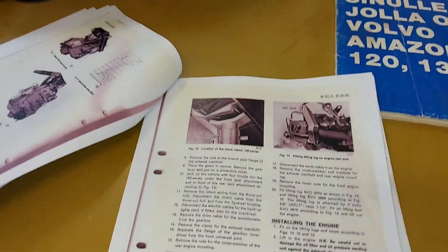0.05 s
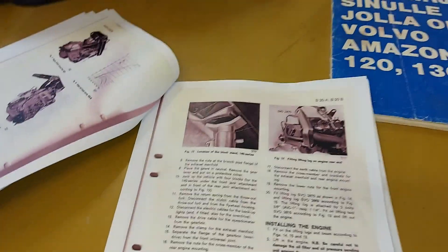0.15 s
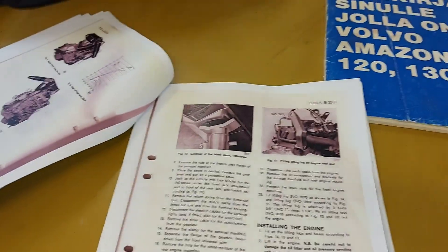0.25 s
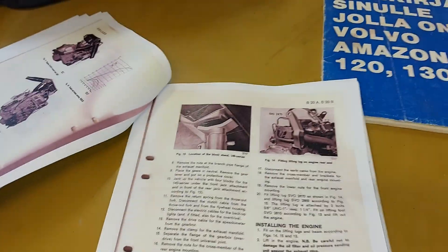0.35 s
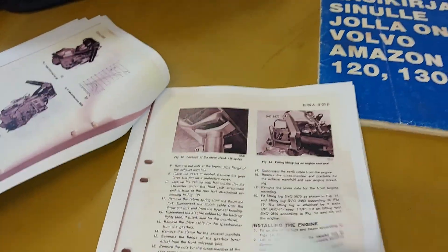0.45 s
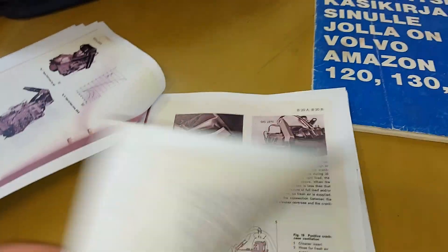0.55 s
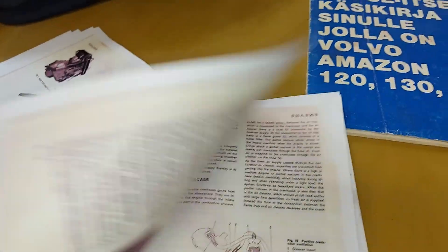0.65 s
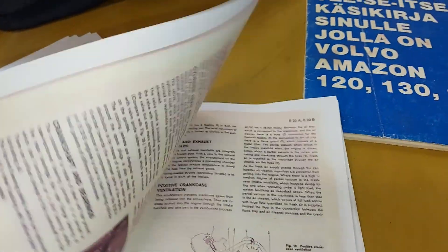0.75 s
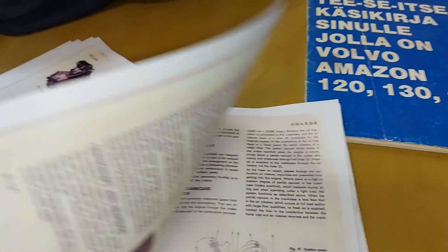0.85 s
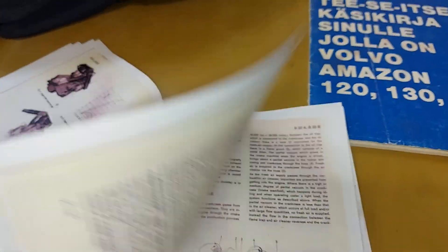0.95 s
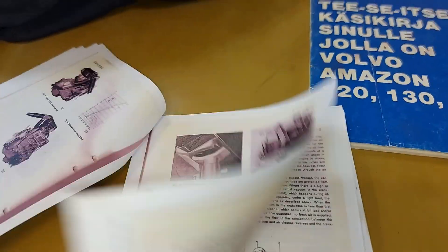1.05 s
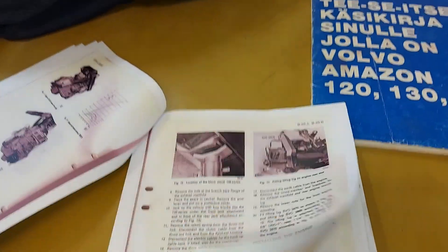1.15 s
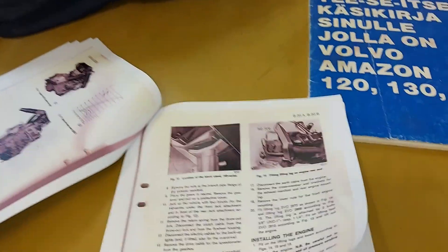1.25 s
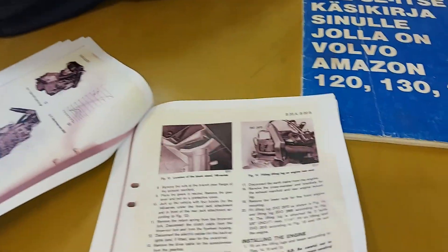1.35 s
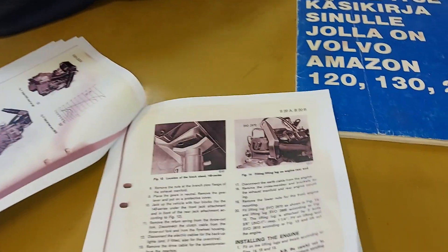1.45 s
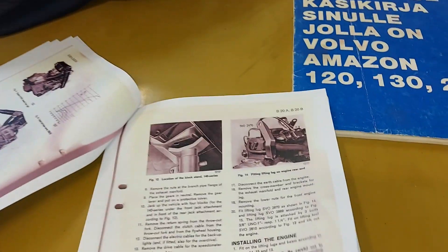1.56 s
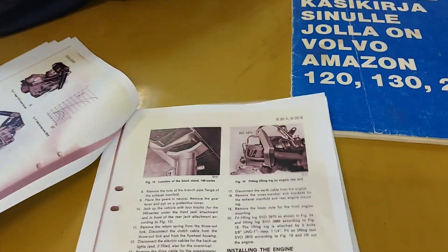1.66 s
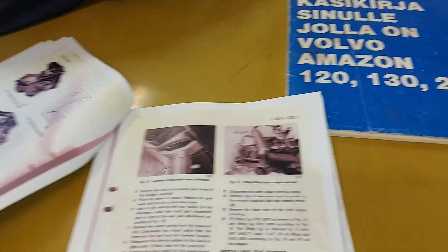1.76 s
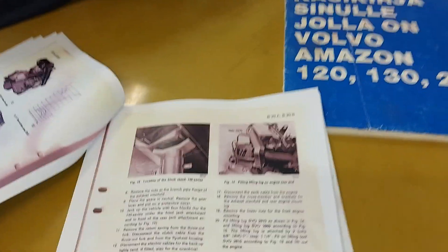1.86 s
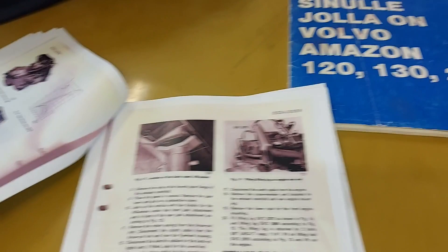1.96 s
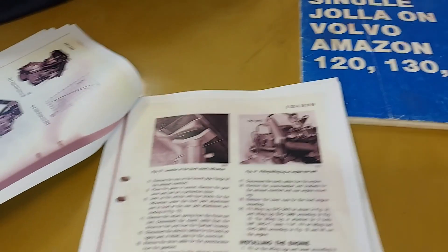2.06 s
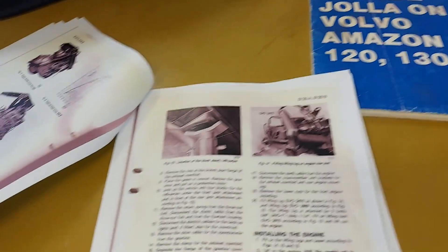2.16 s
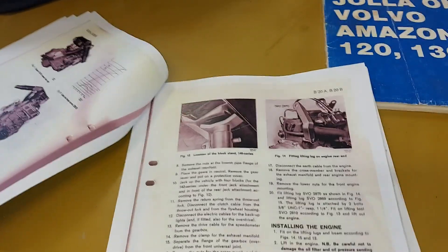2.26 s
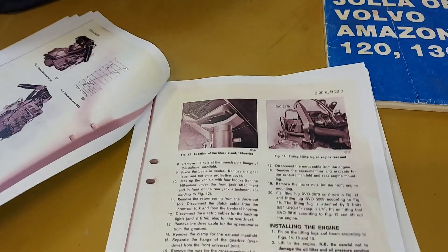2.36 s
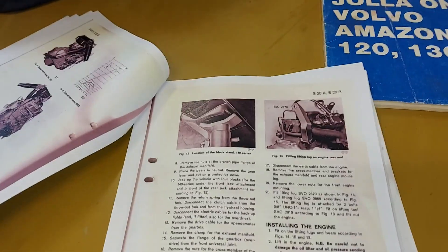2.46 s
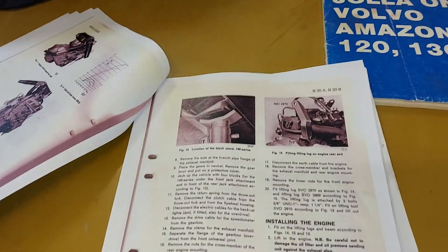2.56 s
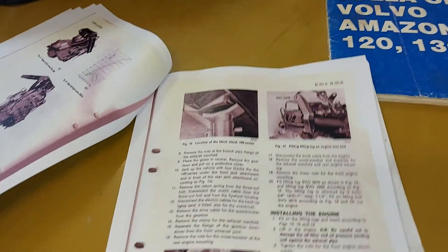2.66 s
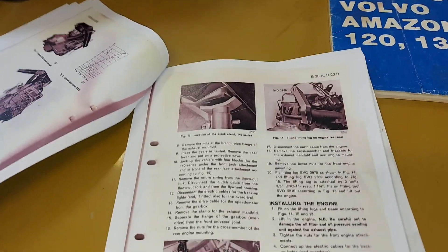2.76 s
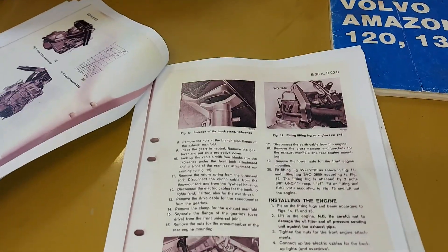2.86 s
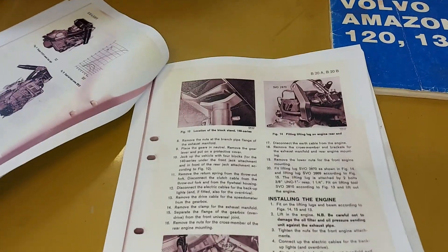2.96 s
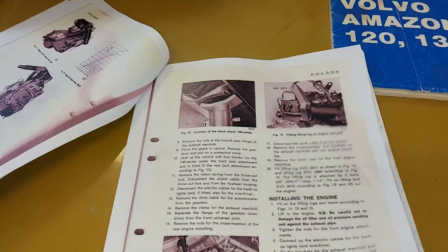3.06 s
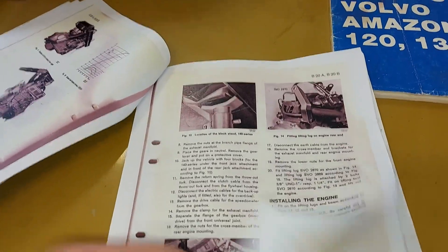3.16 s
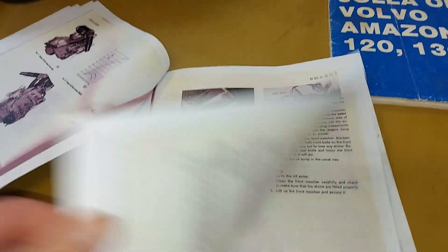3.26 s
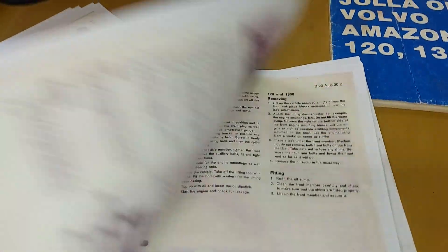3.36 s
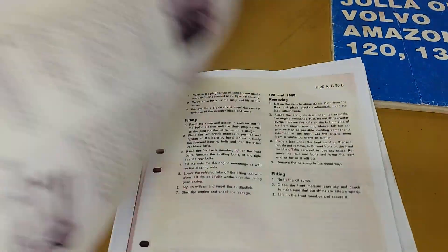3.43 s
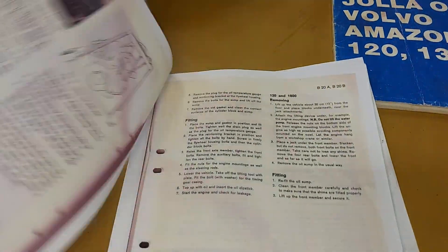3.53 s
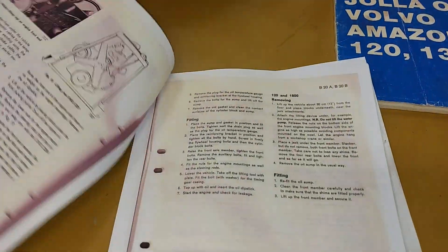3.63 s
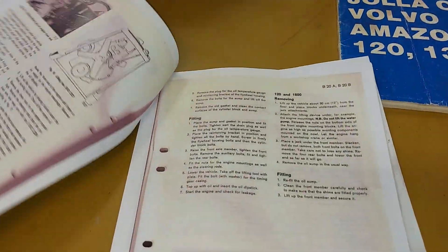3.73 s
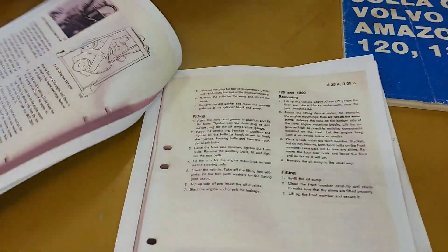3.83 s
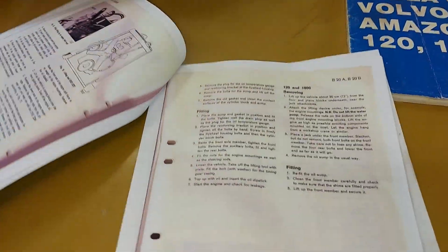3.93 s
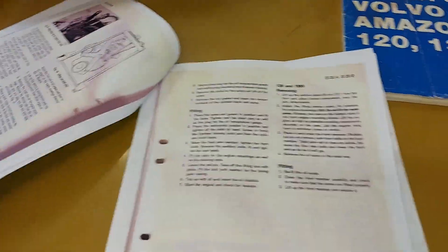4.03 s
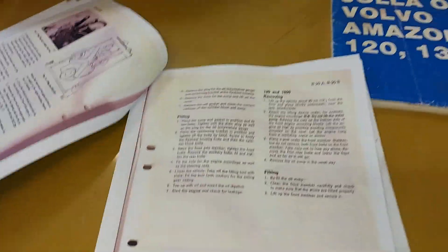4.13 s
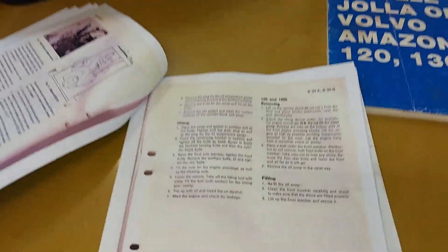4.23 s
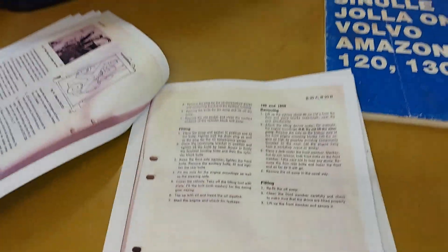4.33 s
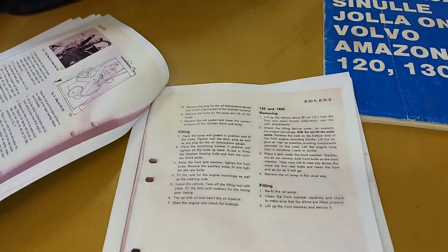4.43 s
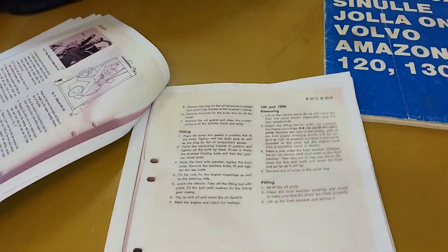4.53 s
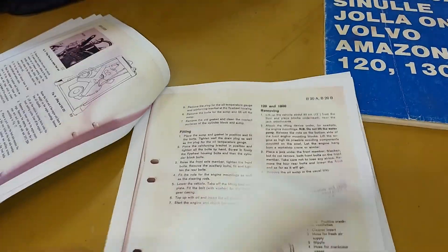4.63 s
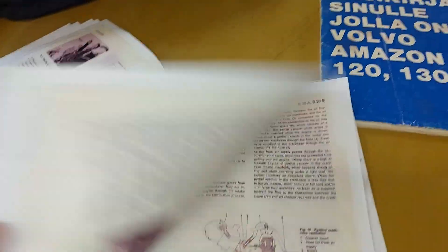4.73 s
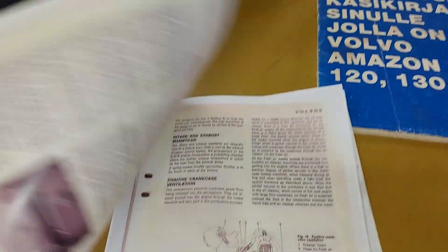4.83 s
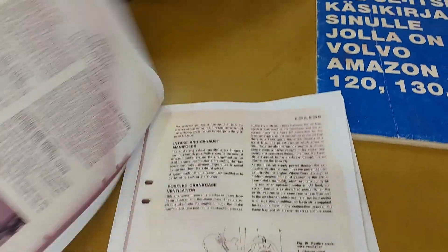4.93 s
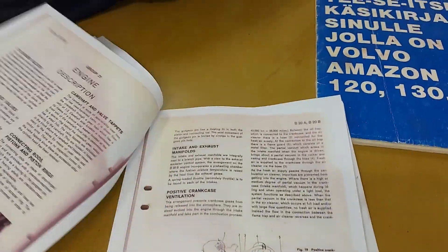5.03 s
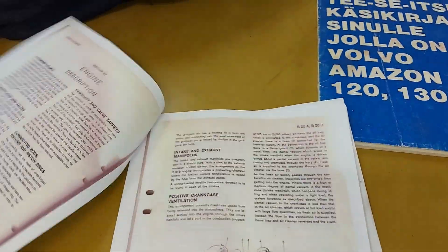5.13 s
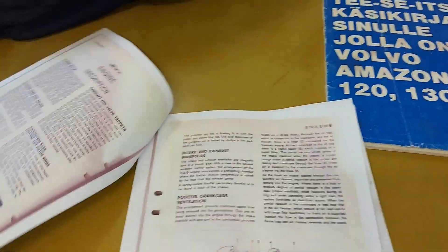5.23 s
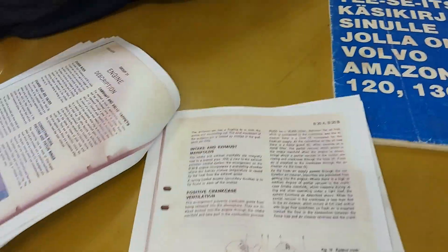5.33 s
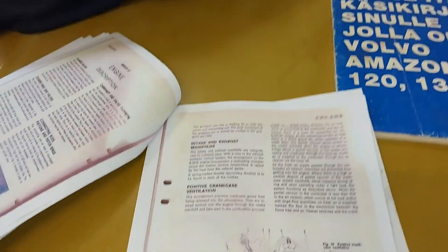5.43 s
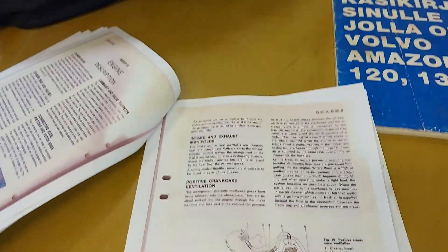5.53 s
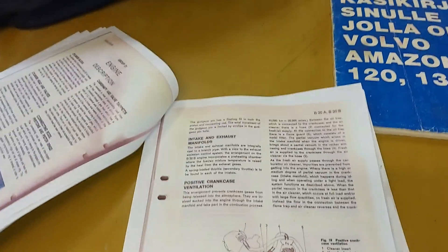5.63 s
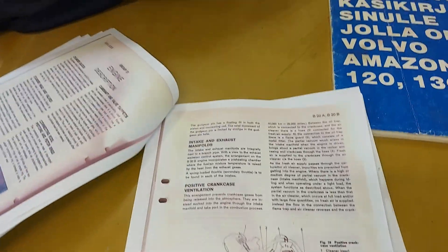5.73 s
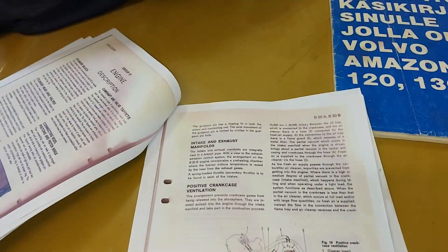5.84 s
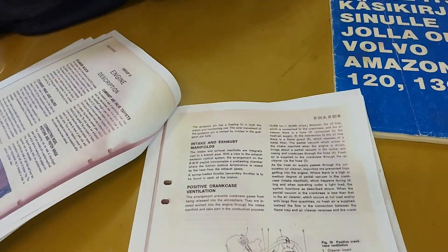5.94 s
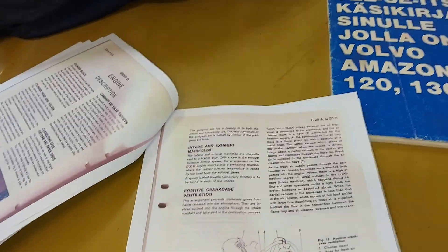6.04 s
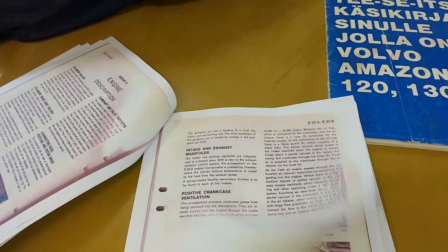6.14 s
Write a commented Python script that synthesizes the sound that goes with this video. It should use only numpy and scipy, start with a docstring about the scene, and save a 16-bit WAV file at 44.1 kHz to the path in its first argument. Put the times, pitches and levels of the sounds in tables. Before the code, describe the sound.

Paper pages are turned close by in three short bouts of rustling, flapping and crackling, with brief pauses in a quiet room.

```python
"""Leafing through loose sheets.

Printed sheets are turned on a desk in a quiet workshop, close to a near-mono microphone. Each slides
off the pile by stick-slip friction, bends and buckles with small snaps, flaps over with puffs of air
and settles on the turned pile. In a pause something rings faintly further off."""
import sys
import numpy as np
from scipy import signal
from scipy.fft import rfft, irfft
from scipy.io import wavfile
from scipy.ndimage import uniform_filter1d

SR = 44100
rng = np.random.default_rng(int(sys.argv[2]) if len(sys.argv) > 2 else 0)


def log_audio(samples):
    """Write samples as a 16-bit WAV file to the path given in sys.argv[1]."""
    # one column per channel
    frames = np.atleast_2d(samples).T
    # limit to full scale, then quantise
    limited = np.clip(frames, -1, 1)
    pcm = np.round(limited * 32767).astype(np.int16)
    wavfile.write(sys.argv[1], SR, pcm)


N = 272927
TIME = np.arange(N) / SR


# Pulls of one sheet over another. Each row: time of full contact, attack and length in seconds, then
# relative level, its change over the stroke and relative treble emphasis, all in dB.
STROKES = [(.005, 0.047, 0.11, -60.5, 1, -16), (0.152, 0.0075, 0.038, -43.5, 2, 1.5),
           (0.215, 0.012, 0.028, -41.5, -1.5, -1.5), (0.254, 0.016, 0.06, -37.5, 1.5, 3.5),
           (0.386, 0.13, 0.1, -46.5, 1.5, 9), (0.583, 0.052, 0.046, -46.5, -1, 11),
           (0.69, 0.044, 0.12, -58.5, 3.5, 8), (0.836, 0.006, 0.062, -41.5, -3, -7),
           (0.958, .04, 0.1, -55.5, -3, 4), (1.17, 0.085, 0.17, -57.5, -1, 4),
           (1.376, 0.004, 0.17, -49, -2, 5), (1.599, 0.025, 0.068, -51.5, 1, 9),
           (1.724, 0.032, 0.32, -63.5, -16, 10.5), (2.312, .012, 0.33, -73, 6, 8),
           (2.768, 0.08, 0.11, -53.5, -4.5, 2), (3.002, 0.023, 0.021, -36, 6.5, 2),
           (3.04, .03, 0.047, -44.5, -14.5, 18), (3.102, 0.024, 0.13, -48.5, -9.5, 12.5),
           (3.216, 0.1, 0.17, -58.5, 2, -10), (3.461, 0.048, 0.096, -54, -8, -19),
           (3.615, 0.075, 0.021, -53.5, 4.5, -4.5), (3.857, 0.029, 0.15, -60, -14.5, 9.5),
           (4.033, 0.0089, 0.64, -64.5, -13, 9), (4.273, .03, 0.082, -62, 4, 9.5),
           (4.387, 0.015, 0.06, -38.5, -0.5, 0), (4.509, .015, 0.029, -39, -5.5, 5),
           (4.558, 0.026, 0.072, -46, 0.5, 7), (4.68, .03, 0.12, -56.5, 6.5, 9.5),
           (4.829, 0.037, 0.023, -47, -2, 9.5), (4.864, .03, 0.17, -56, -9, 9),
           (5.275, 0.014, 0.048, -60.5, 3, 12.5), (5.351, 0.032, 0.14, -62.5, -12.5, 10),
           (5.796, 0.042, 0.13, -55.5, -20, 18), (5.933, 0.013, 0.13, -30.5, -12, 3),
           (6.068, 0.083, .11, -40.5, -17, 10)]

def pulling():
    """Incoherent strokes add in power: gives their joint level and mean treble emphasis in dB."""
    power, treble = 1e-14, 0
    for start, attack, length, db, change_db, treble_db in STROKES:
        progress = np.clip((TIME - start) / length, 0, 1)
        release_s = 0.038 if db + change_db > -45 else 0.055  # a firm pull stops sooner
        stroke = undb(db + change_db * progress + swell(start, attack, release_s, length)) ** 2
        power += stroke
        treble += stroke * treble_db
    return 10 * np.log10(power), treble / power


# Friction spectra of firm and light contact. Each row: frequency in Hz, relative density in dB.
FIRM_RUB = [(180, -56), (300, -31), (498, -26), (680, -14.5), (959, -9.5), (1790, -6), (2320, 2.5),
            (3270, 0), (4180, 2), (4850, -5.5), (9800, -20), (15000, -47.5)]
LIGHT_RUB = [(300, -26.5), (700, 2.5), (1500, -0.5), (2800, 0), (4500, 2.5), (6000, -7), (7200, -15.5),
             (10000, -30.5), (12500, -51)]

def sliding(level_db, treble_db):
    """Stick-slip friction: dense micro-slips hiss, in a spectrum set by the firmness of the pull."""
    firm = 1 / (1 + np.exp(-(level_db + 47) / 3.6))
    rub = np.sqrt(firm) * colour(slips(rate=4200, spread_db=2.2, hiss=0.35), FIRM_RUB)
    rub += np.sqrt(1 - firm) * colour(slips(rate=3500, spread_db=3, hiss=0.56), LIGHT_RUB)
    # the curl of the sheet changes, so narrow resonances come and go
    for hz in np.geomspace(2400, 7500, num=7):
        gain = undb(2.05 * np.tanh(walk(12)))
        rub += (gain - 1) * resonance(rub, hz * rng.uniform(1, 1.05), q=9.3)
    rub += (undb(treble_db - 3) - 1) * above(rub, 6250)
    rub *= flutter(rate=330, depth_db=1.7)
    return desk_echo(rub, lag_s=0.001392, sway=0.236, share=0.24) * undb(level_db - 1.5)


# Buckles of the sheet. Each row: start in seconds, relative level in dB, pitch in Hz, cycles of ring.
SNAPS = [(0.567, -31.5, 1690, 0.58), (1.818, -35, 5300, 1), (1.829, -39, 5740, 1.9),
         (1.877, -36.5, 6840, 4.8), (1.995, -40.5, 6750, 2), (2.5771, -31, 1430, 1.1),
         (2.781, -34, 3800, 0.88), (2.8518, -41, 1060, 3.5), (2.852, -32, 2820, 2.4),
         (3.2716, -20.5, 880, 1.67), (3.2734, -23, 3600, 1.3), (3.4634, -14, 2440, 0.55),
         (3.4738, -18, 785, 0.59), (4.263, -35.5, 4650, 7.3), (4.275, -36, 3340, 1.4),
         (4.3219, -24, 4060, 3.4), (4.488, -22.5, 1970, 0.44), (4.559, -24, 4400, 2),
         (4.709, -27, 1220, 0.33), (4.7795, -22.5, 2380, 1.27), (5.8045, -30, 3830, 1.7)]

def snapping():
    """Snap-through buckling: a patch flips with a tick and a damped ring, then the sheet shivers."""
    out, t = np.zeros(N), TIME[:SR // 16]
    for start, db, hz, cycles in SNAPS:
        tick = undb(-13) * np.exp(-t / 0.00013)
        flip = np.sin(2 * np.pi * hz * t) * np.exp(-t * hz * 1.3 / cycles)
        crack = 0.19 * noise_band(len(t), 0.74 * hz, q=0.97) * np.exp(-t / 0.0029)
        shiver = 0.034 * noise_band(len(t), 0.95 * hz, q=1) * np.exp(-t / 0.017)
        # a small patch radiates no bass; larger ones flip more slowly and are duller
        snap = highpass(tick + flip + crack + shiver, 200 + 0.34 * hz, order=3)
        snap = lowpass(snap, 3700 + 0.66 * hz, order=6)
        add(out, start, snap * undb(db + 1.5))
    return out


# The sheet whips taut or lands. Each row: time in seconds, relative levels of air pulse and slap in dB,
# slap length in seconds, pitch of the hollow under the sheet in Hz.
FLAPS = [(0.9457, -45, -41.5, 0.012, 370), (0.973, -37.5, -41.5, 0.014, 347),
         (1.0042, -31.5, -37, 0.0077, 416), (1.0468, -31, -37.5, 0.0026, 235),
         (1.138, -39, -43, 0.011, 330), (1.1705, -31, -42.5, 0.011, 295), (1.2536, -57, -45.5, 0.0029, 724),
         (1.274, -44, -49, 0.0079, 296), (1.286, -49, -45.5, 0.0072, 370), (1.314, -44, -45, 0.011, 330),
         (3.105, -47, -59, 0.0025, 260), (3.305, -46.5, -42, 0.0074, 370), (3.466, -37, -52, 0.0049, 590),
         (4.844, -39.5, -42, 0.0032, 340)]
# Spectrum of a slap. Each row: frequency in Hz, relative density in dB.
SLAP_SPECTRUM = [(80, -5.5), (500, 8), (1200, 2), (3000, 1), (5000, -16), (6800, -12), (10000, -31.5),
                 (13000, -65)]
# Modes of the arched sheet. Each row: nominal frequency in Hz, Q, relative level in dB.
ARCH_MODES = [(1626, 4, -4), (4460, 15, -2)]

def flapping():
    """Impulse excitation: a flap throws a pulse of air, and its crackle rings the arch and hollow."""
    out, t = np.zeros(N), TIME[:SR // 10] - 0.006
    before, after = np.minimum(t, 0), np.maximum(t, 0)
    crackle = slips(rate=2200, spread_db=1.5, hiss=0.4)
    u = t / 0.0012
    pulse = (u ** 2 - u / 2 - 1) * np.exp(-u ** 2)  # a push, then a deeper suck
    tail = 0.09 * (t > 0) * np.exp(-after / 0.013)
    for when, pulse_db, slap_db, length, hollow_hz in FLAPS:
        contact = np.exp(before / 0.0014 - (after / length) ** 4) + tail
        patter = crackle[int(when * SR):][:len(t)] * contact
        detune = np.exp(0.04 * rng.standard_normal())
        arch = sum(undb(db) * np.sqrt(q * SR / np.pi / hz) * resonance(patter, hz * detune, q)
                   for hz, q, db in ARCH_MODES)
        hollow = undb(21.5) * resonance(patter, hollow_hz, q=3.2)
        slap = colour(patter, SLAP_SPECTRUM) + lowpass(arch + hollow, 5900, order=4)
        add(out, when + t[0], undb(pulse_db + 3.5) * pulse + undb(slap_db - 4) * slap)
    return out


# The sheet flexes. Each row: peak time in seconds, relative level in dB, rise and fall in seconds.
FLEXES = [(.3, -51.5, 0.29, 0.28), (.62, -44.5, 0.11, 0.067), (.8, -50.5, 0.28, 0.12),
          (.838, -38.5, 0.0085, 0.052), (.876, -38, 0.044, 0.041), (1.38, -56.5, 0.017, 0.53),
          (2.585, -54, 0.073, 0.14), (3.14, -53, 0.028, 0.17), (3.29, -54, 0.02, 0.52),
          (3.48, -34, 0.027, 0.026), (3.568, -40, 0.0053, 0.07), (3.635, -46, 0.16, 0.2),
          (4.886, -50, 0.36, 0.15), (5.085, -41, 0.11, 0.064), (5.21, -54.5, 0.18, 0.11)]
# Response of its broad face. Each row: frequency in Hz, relative density in dB.
FACE_SPECTRUM = [(60, -14.5), (400, -8), (820, 2.5), (1150, -4.5), (1650, -3.5), (2500, -13.5),
                 (4500, -27.5), (9000, -64.5)]

def bending():
    """Forced plate vibration: creaks drive the face of the sheet, whose pitch shifts as it curves."""
    creak = slips(rate=2500, spread_db=1.6, hiss=0.55) * flutter(rate=140, depth_db=2)
    face = wander(colour(creak, FACE_SPECTRUM), sway=0.17, rate=22)
    return desk_echo(face, lag_s=0.00257, sway=0.289, share=0.47) * swells(FLEXES) * undb(-1.5)


# An edge catches. Each row: centre in seconds, level in dB, pitch in Hz, half length in seconds.
SCUFFS = [(0.098, -57, 3460, 0.0037), (0.129, -55.5, 4000, 0.0038), (0.306, -37, 2740, 0.0056),
          (0.344, -43, 2060, 0.0021), (0.412, -40, 2940, 0.0041), (0.738, -45, 885, 0.0048),
          (1.519, -50, 3870, 0.016), (3.108, -33.5, 3250, 0.0025), (3.109, -41.5, 910, 0.0033),
          (3.542, -44, 830, 0.0082), (3.573, -39.5, 1050, 0.0049), (3.73, -58, 1620, 0.0027),
          (4.156, -54.5, 3800, 0.01), (4.495, -35, 3340, 0.0043), (4.564, -32, 3570, 0.0034),
          (4.597, -34.5, 3140, 0.0033), (4.832, -41.5, 4800, 0.011), (5.014, -54, 3000, 0.019),
          (5.079, -41.5, 1370, 0.013), (5.204, -57, 1100, 0.018), (6.072, -30.5, 3060, 0.0035)]

def scuffing():
    """Transient friction: an edge drags over the pile in a brief swell of band-limited noise."""
    out, t = np.zeros(N), TIME[:SR // 16] - 1 / 32
    for centre, db, hz, half_s in SCUFFS:
        rasp = unit(lowpass(noise_band(len(t), hz, q=1.46), 1900 + 0.93 * hz, order=3))
        add(out, centre + t[0], rasp * bell(t, half_s) * undb(db))
    return out


# The curl sings. Each row: centre in seconds, level in dB, pitch in Hz, half length in seconds.
SINGS = [(0.179, -45.5, 950, 0.0067), (0.17, -43.5, 4060, 0.0094), (0.286, -51, 683, 0.026),
         (1.616, -48.5, 4340, 0.016)]

def singing(q=5.85, sag_per_s=1.5):
    """Friction-driven resonance: a narrow band sounds, sinking in pitch as the curl opens."""
    out, t = np.zeros(N), TIME[:SR // 4] - 1 / 8
    for centre, db, hz, half_s in SINGS:
        tone = unit(resonance(noise_band(len(t), hz, q), hz, q))
        sinking = np.interp(t - sag_per_s * t ** 2 / 2, t, tone)
        add(out, centre + t[0], sinking * bell(t, half_s) * undb(db))
    return out


# The sheet pushes air. Each row: peak time in seconds, relative level in dB, rise and fall in seconds.
GUSTS = [(.6, -60.5, 0.11, 0.24), (.885, -47, 0.081, 0.074), (1.19, -55.5, 0.15, 0.43),
         (1.385, -54, 0.09, 0.049), (2.32, -62, 0.027, 0.14), (2.545, -54, 0.012, 0.22),
         (2.63, -59.5, .1, 0.18), (3.13, -58, 0.013, 0.23), (3.485, -47.5, 0.04, 0.24),
         (4.054, -65.5, 0.034, 0.067), (4.785, -53.5, 0.019, 0.082), (4.865, -52, .1, 0.12)]
# Spectrum of a gust. Each row: frequency in Hz, relative density in dB.
GUST_SPECTRUM = [(20, -8.5), (70, -2.5), (120, -7), (340, -2), (600, -13), (1200, -18), (4000, -74)]

def wafting():
    """Air displacement: the flow squeezed from under the sheet flutters at the microphone."""
    air = colour(rng.standard_normal(N), GUST_SPECTRUM) * flutter(rate=100, depth_db=3)
    return highpass(air * swells(GUSTS), 40)


# Trapped air escapes. Each row: centre in seconds, envelope peak in dB.
THUMPS = [(0.963, -43), (0.992, -43), (1.023, -40), (1.062, -45), (3.322, -47), (4.057, -54), (4.86, -46.5)]

def thumping(hz=68, half_s=0.009):
    """Pressure release: the air cushion under the sheet gives way in a deep cycle or two."""
    out, t = np.zeros(N), TIME[:SR // 8] - 1 / 16
    throb = np.sin(2 * np.pi * hz * t) * bell(t, half_s)
    for centre, db in THUMPS:
        add(out, centre + t[0], throb * undb(db))
    return out


# A hand or sheet knocks the pile against the desk. Each row: start in seconds, relative level in dB.
KNOCKS = [(2.543, -56), (2.578, -49), (3.535, -46)]
# Modes of the pile. Each row: frequency in Hz, relative level in dB, 60 dB decay time in seconds.
PILE_MODES = [(244, -6.5, 0.32), (393, -3.5, 0.12), (480, -13, 0.11), (647, 2.5, 0.11)]

def knocking():
    """Modal vibration: a dull knock leaves the low modes of the pile to decay freely."""
    out, t = np.zeros(N), TIME[:SR // 3]
    body = sum(undb(db) * np.sin(2 * np.pi * hz * t) * decay(t, t60) for hz, db, t60 in PILE_MODES)
    for start, db in KNOCKS:
        add(out, start, body * undb(db))
    return out


# Modes of a far ring. Each row: frequency in Hz, level in dB, 60 dB decay time in seconds.
RING_MODES = [(567, -62, 3.2), (1180, -66, 1.37)]

def far_ring(start_s=1.67):
    """Damped oscillation: two softly started tones die away, each wavering with narrow-band noise."""
    out, t = np.zeros(N), np.maximum(TIME - start_s, 0)
    for hz, db, t60 in RING_MODES:
        tone = np.sin(2 * np.pi * hz * t) + 0.49 * noise_band(N, hz, q=11)
        out += tone * undb(db) * decay(t, t60)
    return out * (1 - np.exp(-t / 0.015))


def desk_echo(x, lag_s, sway, share):
    """Comb filtering: the desk reflects the sound over a path that changes as the sheet moves."""
    lag = lag_s * np.exp(sway * walk(5))
    return (x + share * np.interp(TIME - lag, TIME, x)) / np.hypot(1, share)


def workshop(x, wet_db, t60_s, dull_hz):
    """Diffuse reverberation: the room adds a weak tail whose treble dies first."""
    t = TIME[:SR]
    reflections = rng.standard_normal(SR) * (t > 0.006)
    fade = decay(t, t60_s)
    tail = lowpass(reflections, dull_hz) * fade + 0.92 * reflections * fade ** 7.2
    return x + undb(wet_db) * signal.fftconvolve(x, tail / np.linalg.norm(tail))[:N]


# Spectrum of the quiet room. Each row: frequency in Hz, relative density in dB.
ROOM_SPECTRUM = [(20, -18.5), (55, 1), (100, 0), (160, -7.5), (900, -12.5), (1900, -27), (4400, -27),
                 (7300, -39), (15500, -32)]

def room_tone():
    """Ambient noise floor: a faint rumble whose level drifts slightly."""
    return colour(rng.standard_normal(N), ROOM_SPECTRUM) * undb(-73.5 + 0.45 * walk(1))


def slips(rate, spread_db, hiss):
    """Poisson process: fibres catch and let go in tiny uneven clicks over a smooth hiss."""
    size = undb(spread_db * np.minimum(rng.exponential(size=N), 2 * np.pi))
    clicks = (rng.random(N) < rate / SR) * size * rng.choice([-1, 1], N)
    return unit(unit(clicks) + hiss * rng.standard_normal(N))


def walk(rate):
    """Smoothed random signal of rms 1 that changes about rate times a second."""
    step = int(SR / rate)
    held = rng.standard_normal(N)[np.arange(N) // step]
    return unit(uniform_filter1d(held, step))


def flutter(rate, depth_db):
    """Amplitude modulation: a quick, bounded, random change of gain."""
    return unit(undb(depth_db * np.tanh(walk(rate))))


def wander(x, sway, rate):
    """Frequency modulation: the resonances of a steady noise drift up and down together."""
    place = np.cumsum(np.exp(sway * np.tanh(walk(rate))))
    return np.interp(place % N, np.arange(N), x)


def swell(peak_s, rise_s, fall_s, hold_s=0):
    """Exponential envelope in dB; rise and fall are the times for 20 dB."""
    return -20 * (np.maximum(peak_s - TIME, 0) / rise_s + np.maximum(TIME - peak_s - hold_s, 0) / fall_s)


def swells(table):
    """Power summation: the joint amplitude of overlapping swells."""
    return np.sqrt(sum(undb(db + swell(peak, rise, fall)) ** 2 for peak, db, rise, fall in table))


def bell(t, half_s):
    """Gaussian envelope of standard deviation half_s."""
    return np.exp(-0.5 * (t / half_s) ** 2)


def decay(t, t60):
    """Exponential decay of 60 dB in t60 seconds."""
    return undb(-60 * t / t60)


def colour(x, points, size=2048):
    """Minimum-phase filter of unit power gain, shaped by (Hz, dB) points."""
    hz, db = np.transpose(points)
    grid = np.maximum(np.fft.rfftfreq(size, 1 / SR), 1)
    gain = undb(np.interp(np.log(grid), np.log(hz), db))
    cepstrum = irfft(np.log(gain))
    cepstrum[1:size // 2] *= 2
    cepstrum[size // 2 + 1:] = 0
    response = irfft(np.exp(rfft(cepstrum)))
    return signal.fftconvolve(x, response / np.linalg.norm(response))[:len(x)]


def resonance(x, hz, q):
    """Two-pole band-pass, gain 1 at the centre."""
    return signal.lfilter(*signal.iirpeak(hz, max(q, 4 * hz / SR), fs=SR), x)


def noise_band(samples, hz, q):
    """Resonant noise of rms 1."""
    return unit(resonance(rng.standard_normal(samples), hz, q))


def lowpass(x, hz, order=2):
    """Smooth treble loss."""
    return signal.sosfilt(signal.butter(order, hz, fs=SR, output="sos"), x)


def highpass(x, hz, order=2):
    """Smooth bass loss."""
    return signal.sosfilt(signal.butter(order, hz, "high", fs=SR, output="sos"), x)


def above(x, hz):
    """Zero-phase high-pass."""
    return x - lowpass(lowpass(x, hz, order=3)[::-1], hz, order=3)[::-1]


def undb(db):
    """Decibels to gain."""
    return 10 ** (np.asarray(db) / 20)


def unit(x):
    """Scale to rms 1."""
    return x / np.sqrt(np.mean(x ** 2) + 1e-18)


def add(out, start_s, x):
    """Mix x into out from start_s on."""
    i = max(int(start_s * SR), 0)
    out[i:i + len(x)] += x[:N - i]


def scene():
    """Superposition: paper, far ring and room tone sum alike in both channels."""
    friction = sliding(*pulling()) + singing() + scuffing() + bending()
    paper = highpass(friction + wafting() + snapping() + flapping() + thumping() + knocking(), 38)
    mid = room_tone() + workshop(paper, wet_db=-19, t60_s=0.35, dull_hz=2600) + far_ring()
    return np.array([mid, mid])


def record(dry, top_hz=15750):
    """Band limiting: the microphone dulls the top octave; the recorder adds hiss and cuts the top."""
    heard = lowpass(dry, 11200, order=10) + undb(-7.5) * highpass(dry, 11900, order=6)
    hiss = undb(-88.5) * (rng.standard_normal(N) + 0.5 * rng.standard_normal((2, N)))
    return signal.sosfilt(signal.ellip(8, 0.2, 70, top_hz, fs=SR, output="sos"), heard + hiss)


dry = scene()
out = record(dry)
log_audio(out)
```